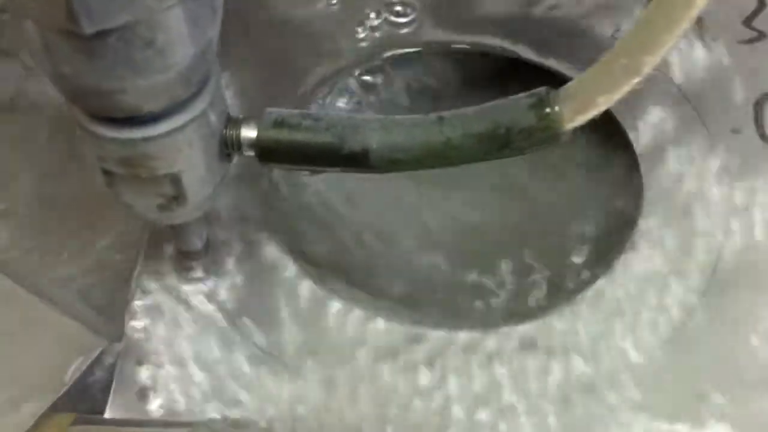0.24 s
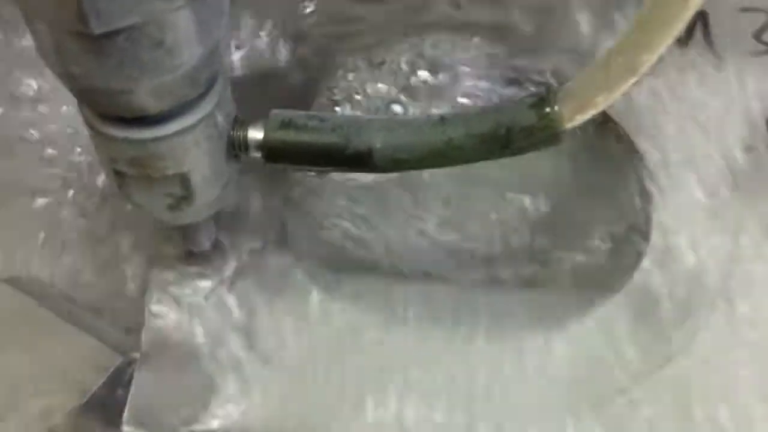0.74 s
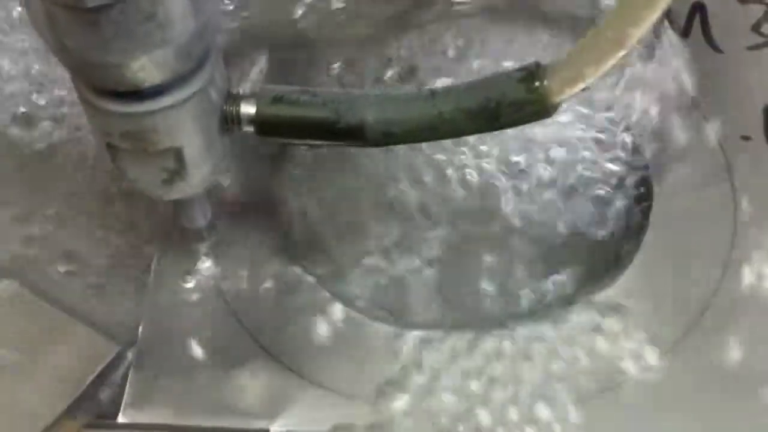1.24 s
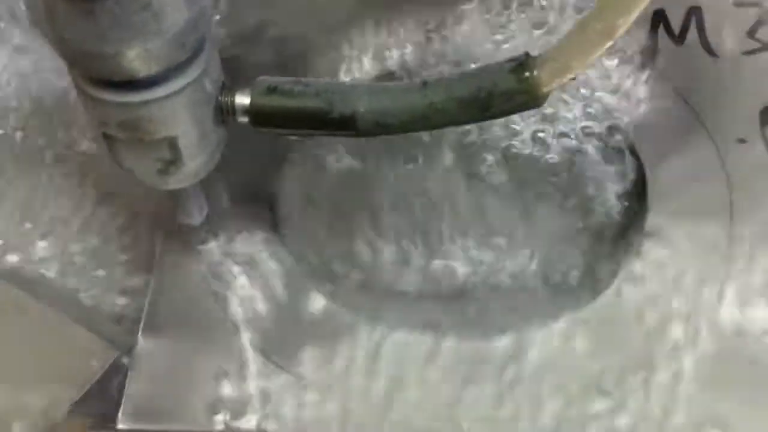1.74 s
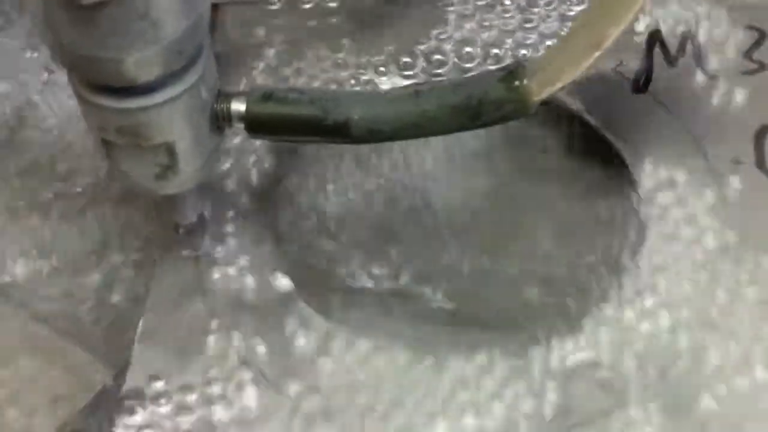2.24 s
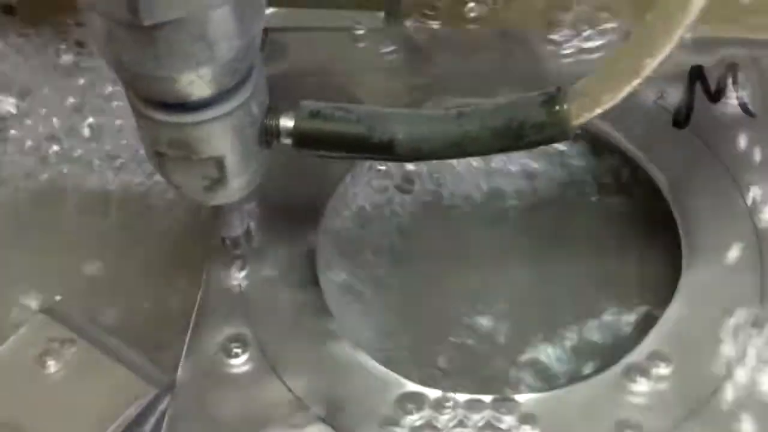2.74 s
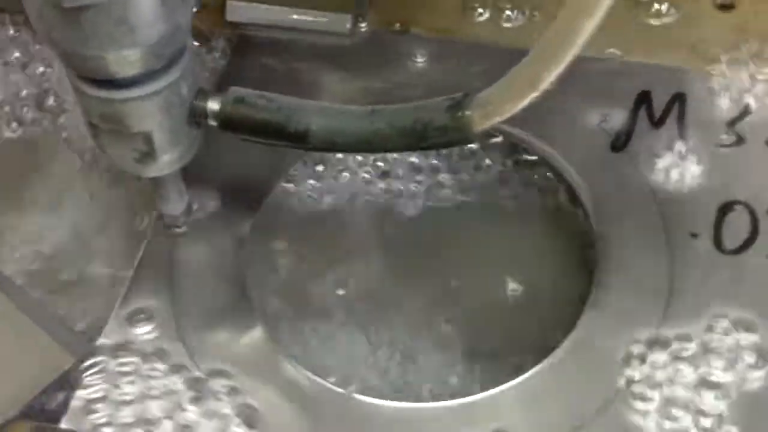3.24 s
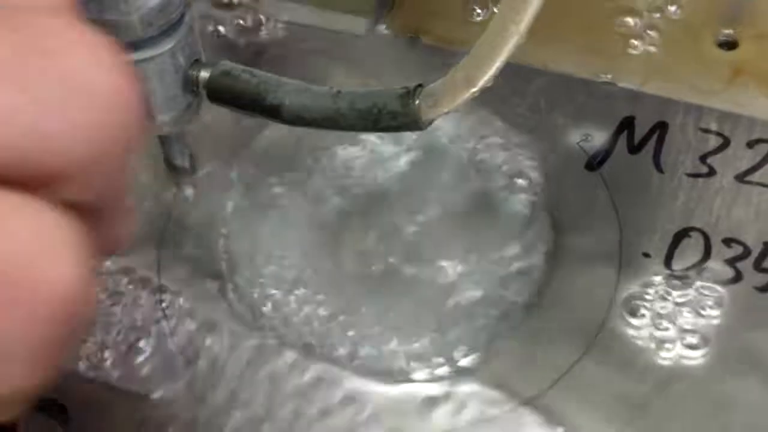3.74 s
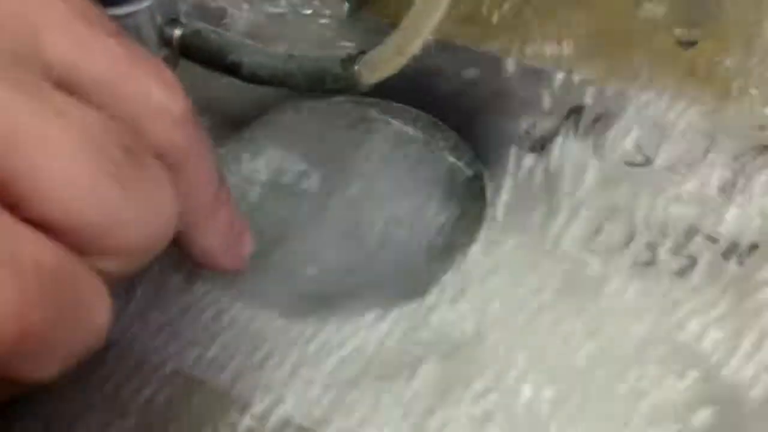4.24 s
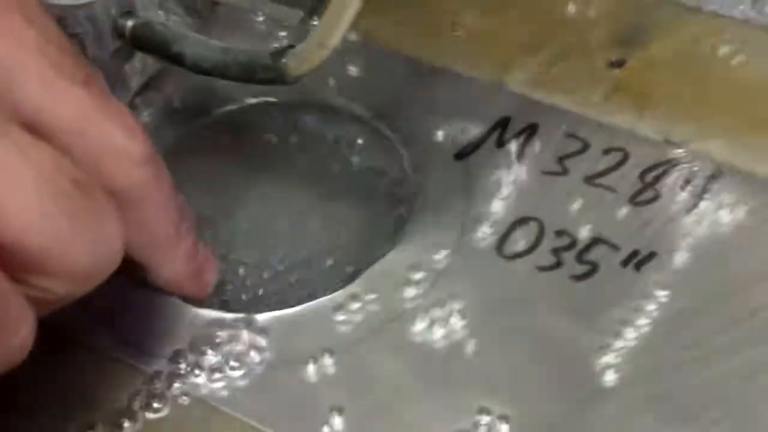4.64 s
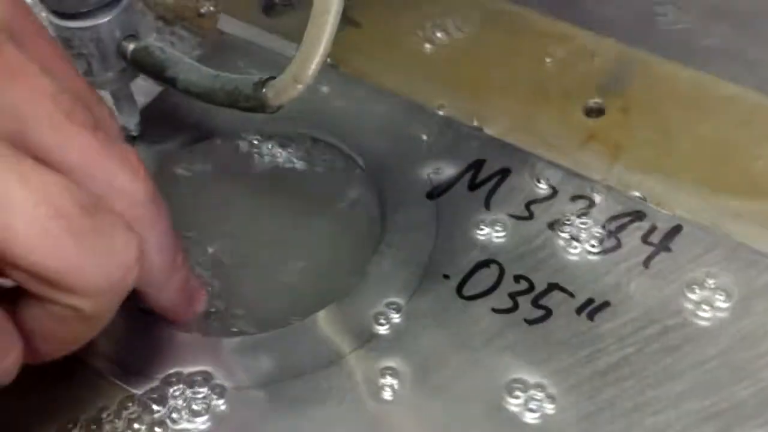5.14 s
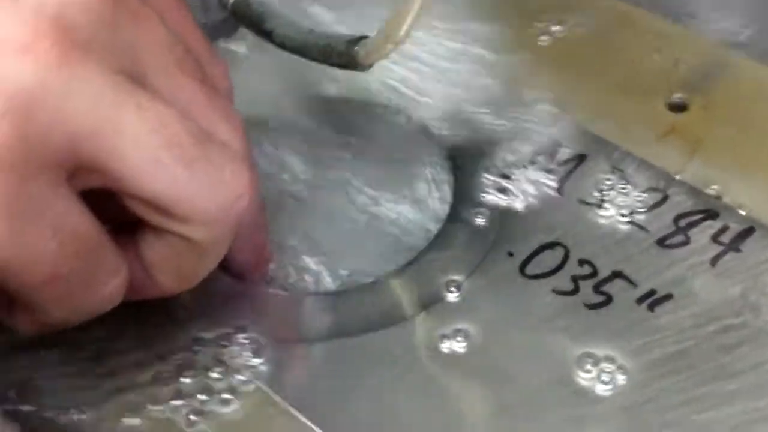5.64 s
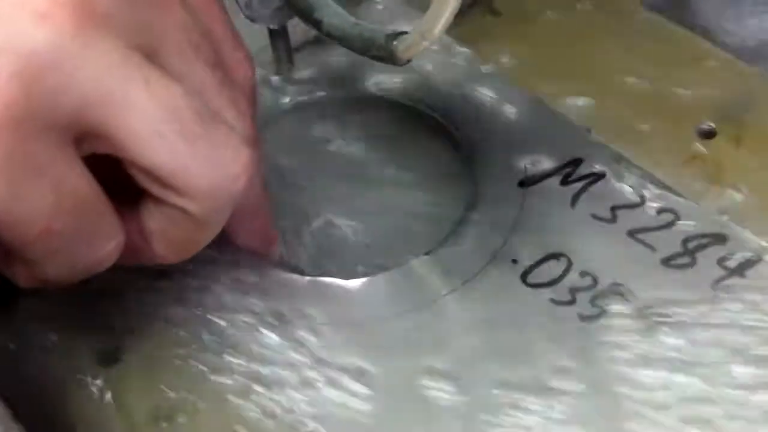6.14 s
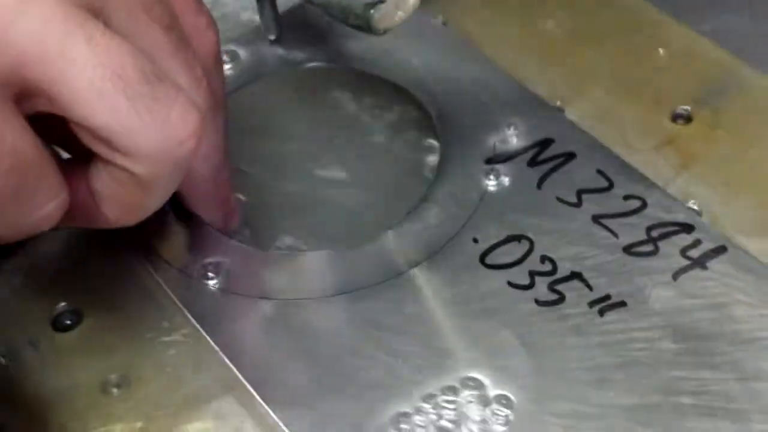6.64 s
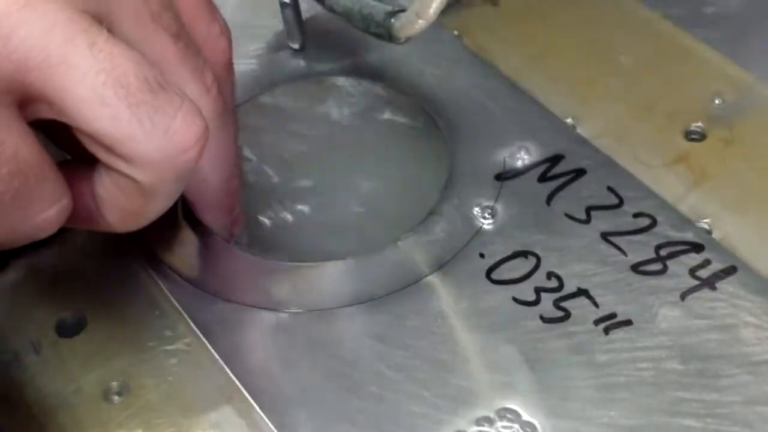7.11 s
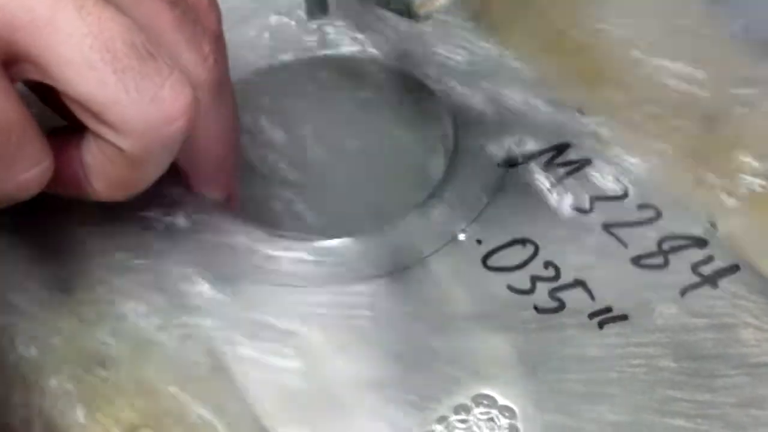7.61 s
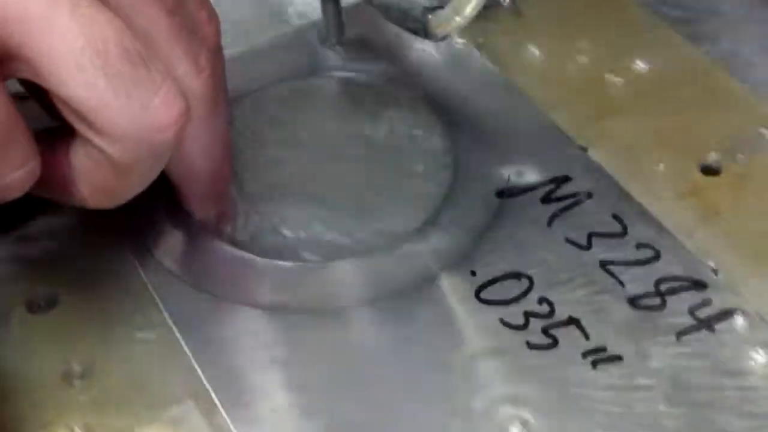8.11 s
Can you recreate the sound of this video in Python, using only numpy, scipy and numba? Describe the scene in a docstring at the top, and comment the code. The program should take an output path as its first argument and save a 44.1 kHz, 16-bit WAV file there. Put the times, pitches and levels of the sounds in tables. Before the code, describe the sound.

Very close and slightly overloaded, a cutting waterjet shrieks and hisses against thin steel over a churning tank. Airy squeals come and go, and drops and gusts give the microphone dull thumps. Three times, water washes over the nozzle, choking the jet to a softer, spitting hiss with bubbling and a low hum underneath. Each time the piercing hiss bursts back through.

```python
"""Waterjet cutting steel

An abrasive waterjet cuts a thin steel sheet awash in its tank, very close to the microphone. In open air
its turbulence excites the gap between nozzle and sheet, and the shriek overloads the microphone. When
water washes over the nozzle the jet sputters and drops to a muffled hiss, unmasking the churning tank
and its low, wavering boom. Spray and gusts buffet the diaphragm."""
import sys
import numpy as np
from scipy import signal
from scipy.fft import rfft, irfft, next_fast_len
from scipy.io import wavfile
from scipy.ndimage import uniform_filter1d
from numba import njit

SR = 44100
rng = np.random.default_rng(int(sys.argv[2]) if len(sys.argv) > 2 else 0)


def put_to_file(sound):
    """Save the sound as 16-bit audio at rate SR, in the file named by the first command-line argument."""
    columns = np.atleast_2d(sound).T  # one column per channel
    safe = np.clip(columns, -1, 1)
    whole_steps = np.round(safe * 32767)
    wavfile.write(sys.argv[1], SR, whole_steps.astype(np.int16))


N = 369116
TIME = np.arange(N) / SR


def undb(db):
    """Amplitude ratio of a level in decibels."""
    return 10 ** (np.asarray(db) / 20)


def unit(x):
    """Normalisation to an rms of one."""
    return x / np.sqrt(np.mean(x ** 2))


def contour(table):
    """Linear interpolation in time through rows of seconds and value."""
    return np.interp(TIME, *np.transpose(table))


def swell(middle, length):
    """Raised-cosine pulse of height one."""
    return np.cos(np.pi * np.clip((TIME - middle) / length, -.5, .5)) ** 2


def held(start, end, decay_s):
    """Unit gate with an exponential release."""
    return (TIME >= start) * np.exp(-np.clip((TIME - end) / decay_s, 0, 20))


def noise():
    """Gaussian white noise."""
    return rng.standard_normal(N)


def walk(cutoff_hz):
    """Slow random fluctuation: low-passed noise with a spread of one."""
    white = rng.standard_normal(4096)
    hz = np.fft.rfftfreq(len(white), TIME[-1] / len(white))
    smooth = unit(irfft(rfft(white) / (1 + (hz / cutoff_hz) ** 4)))
    return np.interp(TIME, np.linspace(0, TIME[-1], len(white)), smooth)


def colour(x, spectrum):
    """Minimum-phase filtering through rows of Hz and dB; the result has an rms of one."""
    hz, db = np.transpose(spectrum)
    size = next_fast_len(N) * 2
    log_hz = np.log(np.fft.rfftfreq(size, 1 / SR) + 1)
    log_gain = np.log(undb(np.interp(log_hz, np.log(hz), db)))
    cepstrum = irfft(log_gain)[:size // 2]
    cepstrum[1:] *= 2  # folding the cepstrum makes the filter causal
    response = np.exp(rfft(cepstrum, size))
    return unit(irfft(rfft(x, size) * response)[:N])


@njit
def band(x, hz, width_hz):
    """Second-order resonator: a state-variable band-pass whose centre may move."""
    y, band_state, low_state = np.empty(len(x)), 0., 0.
    for i in range(len(x)):
        omega = 2 * np.pi * min(hz[i], .45 * SR) / SR
        gain, damping = np.tan(omega / 2), 2 * np.pi * width_hz / SR / np.sin(omega)
        passed = (band_state + gain * (x[i] - low_state)) / (1 + gain * (gain + damping))
        band_state = 2 * passed - band_state
        low_state += 2 * gain * passed
        y[i] = damping * passed
    return y


def resonate(x, hz, width_hz):
    """Two resonators in cascade give a steep resonance; the result has an rms of one."""
    return unit(band(band(x, hz, float(width_hz)), hz, float(width_hz)))


def ring(hz, width_hz, wander):
    """Turbulence excites a resonance whose centre drifts by the fraction `wander`."""
    centre = hz * (1 + wander * walk(24))
    return resonate(noise(), centre, width_hz)


def drops(per_s, spread_db):
    """Shot noise: impacts of either sign at random moments, most small and a few large."""
    size = undb(spread_db * np.minimum(rng.exponential(size=N), 4))
    return (rng.random(N) < per_s / SR) * size * np.sign(noise())


def ripples(x, depth, rate_hz, longest_s, count=16):
    """Comb filtering: short reflections off rippling water come and go, so the colour swirls."""
    lags = (1 + rng.random(count) * longest_s * SR).astype(int)
    echoes = sum(walk(rate_hz) * np.roll(x, lag) for lag in lags)
    return (x + depth * echoes / np.sqrt(count)) / np.sqrt(1 + depth ** 2)


# How hard the jet boils the tank. Each row: time in seconds, relative level in dB.
BOIL = [(0, -3), (3.65, 2.5), (3.85, -8), (4.02, 3), (4.12, -2), (5.3, -1.5), (5.6, -5.5), (5.84, 5.5),
        (6.2, 7), (6.33, 0), (7.24, -3), (7.33, -3.5), (7.54, -4), (7.61, 4.5), (7.7, 0.5), (8.3, 3)]
# Spectrum of the bubbles. Each row: frequency in Hz, relative density in dB.
BUBBLE_SPECTRUM = [(30, 3), (130, 2), (230, -2), (500, -3.5), (780, -0.5), (1030, 6.5), (1150, 3),
                   (1300, 6.5), (1750, 4), (2050, 0), (2450, 3), (3000, -5.5), (4400, -15), (9000, -25)]


def tank_churn():
    """Bubble noise: the spent jet churns the water, and a crowd of bubbles merges into a gurgle."""
    bubbles = colour(noise() + unit(drops(per_s=900, spread_db=1)), BUBBLE_SPECTRUM)
    gurgle = ripples(bubbles, depth=0.53, rate_hz=10, longest_s=.012)
    return gurgle * undb(-29.5 + contour(BOIL) + 2.46 * walk(17))


# Partials of the tank's boom. Each row: frequency in Hz, relative level in dB.
BOOM_PARTIALS = [(80.7, -33.5), (107.7, -39), (166.9, -43.5), (349.9, -46), (409.1, -56)]
# Swells of the boom. Each row: middle and length in seconds, change of the lowest partial in dB,
# change of the upper partials in dB.
BOOM_SWELLS = [(3.85, .8, 3, 8), (5.776, 0.42, 12.5, 9), (6.08, 0.67, -12, 12.5)]


def tank_boom(lowest_db=-8, upper_db=-12):
    """Resonance: the water tank booms in low, wavering partials that swell as it boils."""
    for middle, length, lowest_change, upper_change in BOOM_SWELLS:
        shape = swell(middle, length)
        lowest_db = lowest_db + lowest_change * shape
        upper_db = upper_db + upper_change * shape
    tones = []
    for hz, db in BOOM_PARTIALS:
        amplitude = np.sqrt(2) * undb(db + 2 * walk(2.7))
        wavering_hz = hz * (1 + 0.0138 * walk(8.9))
        tones.append(amplitude * np.sin(2 * np.pi * np.cumsum(wavering_hz) / SR))
    return (tones[0] * undb(lowest_db) + sum(tones[1:]) * undb(upper_db)) * undb(0.82 * contour(BOIL))


# Spectrum of a jolt to the microphone. Each row: frequency in Hz, relative density in dB.
JOLT_SPECTRUM = [(5, 4.5), (25, 1), (60, -1.5), (130, -4.5), (300, -10), (700, -12.5), (1500, -16),
                 (4000, -16.5), (12000, -59.5)]
# Gusts that strike the microphone. Each row: start and length in seconds, relative buffeting in dB,
# relative shove on the diaphragm in dB.
GUSTS = [(0.128, 0.094, -20, -25), (0.348, 0.08, -23.5, -27), (0.556, 0.029, -31, -25),
         (0.729, 0.018, -15.5, -25), (0.825, .04, -24, -21), (1.11, 0.042, -16.5, -20),
         (2.169, 0.081, -18.5, -22), (2.497, 0.077, -20, -20), (2.607, 0.017, -17, -19),
         (3.003, 0.065, -28, -10), (3.691, 0.013, -27, 0), (4.195, 0.022, -16, -1), (4.427, 0.013, -26, -3),
         (5.258, 0.017, -19.5, -25), (6.306, 0.032, -23.5, -25), (6.37, 0.058, -18, -19),
         (7.117, .02, -16, -20), (7.417, .02, -49, -8), (7.473, 0.016, -36, 6.5), (7.794, 0.048, -21.5, -9),
         (7.981, 0.024, -22, -22)]


def gusts(rise_s=0.0052, fall_s=0.023):
    """Damped transient: a gust shoves the diaphragm aside with a short rumble, and it swings back."""
    rumble, out = undb(-16) * colour(noise(), JOLT_SPECTRUM), 0
    for start, _, _, shove_db in GUSTS:
        age = np.clip(TIME - start, 0, 1)
        rise, fall = 1 - np.exp(-age / rise_s), np.exp(-age / fall_s)
        swing = age / (2 * fall_s) - 1
        out = out + undb(shove_db) * rise * fall * (swing + rumble * fall)
    return out


# Blast of spray towards the microphone. Each row: time in seconds, relative level in dB.
BLAST = [(0, -35), (1.05, -28.5), (1.25, -22), (1.95, -23.5), (2.05, -31.5), (2.5, -26), (3.1, -29),
         (3.4, -19), (3.6, -33), (4.15, -45), (4.62, -37.5), (4.85, -19.5), (5.15, -23), (5.38, -49),
         (6.3, -38), (6.52, -30.5), (6.73, -16), (6.82, -27.5), (7.16, -22.5), (7.26, -40.5), (7.7, -38.5),
         (8.12, -30.5), (8.22, -13.5), (8.37, -18.5)]


def spray(clear, puff_rise_s=0.0035, puff_fall_s=0.0049):
    """Wind noise: drops and eddies from the open jet and the gusts jolt the microphone; the air heaves."""
    impacts = unit(drops(per_s=260, spread_db=5.5))
    jolts = colour(impacts + 0.65 * noise(), JOLT_SPECTRUM)
    thrown = np.minimum(uniform_filter1d(clear, SR // 50), 1)
    steady = thrown * undb(contour(BLAST) + 1.3 * walk(18.7))
    puffs = 0
    for start, length, buffet_db, _ in GUSTS:
        rise = np.clip((TIME - start) / puff_rise_s, 0, 1)
        puffs = puffs + undb(buffet_db) * rise * held(start, start + length, puff_fall_s)
    heave = np.maximum(thrown, 0.18) * undb(-21) * walk(23.4)  # some remains while the jet is covered
    return jolts * np.hypot(undb(9) * steady, undb(6.5) * puffs) + heave


# The biggest drops to hit the microphone. Each row: time in seconds, relative peak in dB.
BIG_DROPS = [(0.134, -8), (0.64, -13), (0.734, -15), (1.017, 3), (1.119, -6), (1.576, -14), (1.696, -11),
             (2.177, -11), (2.304, -14), (2.499, -10), (2.61, -13), (3.224, 6), (3.688, -26), (4.191, -22),
             (4.427, -17), (5.064, -23), (6.303, -21), (6.382, -5), (6.617, -14), (7.04, -4), (7.126, -6),
             (7.467, -12)]


def drop_knocks(gain_db=3):
    """Impulse response: each big drop gives the diaphragm one hard, dull knock."""
    knock = colour(signal.unit_impulse(N), JOLT_SPECTRUM)[:SR // 10]
    hits = np.zeros(N)
    for start, db in BIG_DROPS:
        hits[int(start * SR)] = undb(db + gain_db)
    return -signal.fftconvolve(hits, knock / np.abs(knock).max())[:N]


# The nozzle stands clear of the water. Each row: start, end, draining time and flooding time in seconds.
OPEN_SPANS = [(0, 3.647, .01, .09), (4.116, 5.524, .15, .13), (6.27, 7.26, .008, .07),
              (7.696, 8.4, .03, .01)]
# The covered jet spurts through. Each row: start and length in seconds, gain in dB.
SPURTS = [(3.691, 0.0046, -2.5), (3.744, 0.0068, -10.5), (3.79, .003, -23), (3.799, 0.0028, 2.5),
          (3.922, .004, -15.5), (3.942, .004, -25), (3.978, .006, -20), (4.049, .005, -14),
          (4.057, .014, -8), (5.472, 0.013, -10), (5.512, 0.016, -6), (5.625, .002, -17), (7.371, 0.05, 2),
          (7.445, 0.0053, 2), (7.464, .037, 2), (7.507, 0.021, -8), (7.561, 0.013, -10),
          (7.629, 0.0059, -1), (7.642, 0.0054, -3)]
# A wave chokes the open nozzle. Each row: start and length in seconds, nominal gain in dB.
CHOKES = [(0.685, 0.0255, -16.5), (.767, 0.017, -9), (0.994, .016, -13), (2.336, 0.016, -9),
          (2.371, 0.016, -8), (3.592, 0.017, -8), (4.247, 0.0205, -12), (4.301, .011, -15),
          (7.849, 0.0086, -14)]


def clearance(edge_s=0.0014, close_s=0.003, lapping_db=-5.5):
    """Transmission gain of the jet: it breaks through the water at once and is swallowed more slowly."""
    gate = np.zeros(N)
    for start, end, drain_s, flood_s in OPEN_SPANS:
        wet = np.clip(np.maximum(1 - (TIME - start) / drain_s, 1 - (end - TIME) / flood_s), 0, 1)
        gate = np.maximum(gate, undb(lapping_db * wet) * held(start, end, close_s))
    for start, length, db in SPURTS:
        gate = np.maximum(gate, undb(db) * held(start, start + length, close_s))
    for start, length, db in CHOKES:
        choked = (TIME >= start) & (TIME < start + length)
        deepening = 1.5 - np.exp((start - TIME[choked]) / close_s)
        gate[choked] *= undb(db * deepening)
    return uniform_filter1d(gate, int(edge_s * SR))


# Spectrum of the submerged jet. Each row: frequency in Hz, relative density in dB.
MUFFLED_SPECTRUM = [(2000, -11.5), (4400, -8.5), (5500, -5), (5900, 1), (6400, -4), (7400, 1), (8400, -2.5),
                    (9250, -5.5), (10400, 3), (11500, 0), (12600, -3), (13300, -3.5), (15500, -12)]


def covered_jet(clear, sink_s=0.083):
    """Transmission loss: water leaves a muffled hiss and a thin nozzle resonance that grows with depth."""
    hiss = ripples(colour(noise(), MUFFLED_SPECTRUM), depth=0.35, rate_hz=10, longest_s=.004)
    last_clear_s = np.maximum.accumulate(TIME * (clear > .05))
    sunk = np.minimum((TIME - last_clear_s) / sink_s, 1)
    nozzle = undb(-13.5 + 8.5 * sunk) * ring(hz=8680, width_hz=200, wander=0.0026)
    return (hiss + nozzle) * undb(-25.5 + 0.55 * contour(BOIL) + 1.3 * walk(70))


# The loudest squeals. Each row: middle and half-length in seconds, frequency and bandwidth in Hz,
# relative level in dB.
SQUEALS = [(.06, 0.16, 3600, 800, -22), (.07, 0.13, 4470, 1200, -14.5), (0.51, 0.25, 4520, 900, -22),
           (.83, 0.15, 3500, 1500, -20), (.98, .1, 5700, 1800, -17), (1.21, 0.2, 5900, 1700, -13.5),
           (2.075, 0.023, 7270, 700, -15), (2.225, 0.074, 6400, 1600, -14), (2.563, .1, 7180, 1500, -13),
           (2.735, 0.091, 12520, 500, -9), (2.8, 0.072, 10170, 500, -11), (3.24, 0.08, 7140, 900, -11),
           (4.136, 0.03, 4170, 2400, -19.5), (4.42, 0.1, 10560, 450, -8), (5.133, 0.16, 6900, 1500, -11),
           (5.28, 0.23, 7520, 900, -13), (6.92, 0.35, 11670, 700, -29), (7.056, 0.28, 7080, 1200, -11),
           (7.415, 0.053, 10800, 500, -22), (7.565, 0.0082, 8200, 1510, -7),
           (7.633, 0.0085, 11500, 1200, -2), (7.897, 0.061, 7250, 1540, -15),
           (8.05, 0.28, 11060, 500, -13.5)]


def squeals(wander=0.0096):
    """Edge tones: now and then the jet locks onto one airy tone at the edge of the cut."""
    out, drift, turbulence = np.zeros(N), 1 + wander * walk(10.4), noise()
    for middle, half_length, hz, width_hz, db in SQUEALS:
        near = np.abs(TIME - middle) < half_length
        tone = resonate(turbulence[near], hz * drift[near], width_hz)
        out[near] += np.sqrt(2) * undb(db) * np.hanning(len(tone)) * tone
    return out


def stutter(per_s, depth_db, length_s):
    """Amplitude modulation: drops cross the jet at random and choke it for a few milliseconds."""
    hits = (rng.random(N) < per_s / SR) * rng.exponential(size=N)
    dips = signal.fftconvolve(hits, np.hanning(int(length_s * SR)), "same")
    return undb(-depth_db * dips)


# Modes of the gap between nozzle and sheet. Each row: frequency and bandwidth in Hz, relative level in dB.
GAP_MODES = [(8520, 700, -1), (10250, 550, -3), (11250, 700, -1), (12700, 480, -4), (14000, 450, -11)]
# Strength of those modes as the gap fills and drains. Each row: time in seconds, relative level in dB.
GAP_STRENGTH = [(0, -10.5), (1.1, -1.5), (2.3, -0.5), (2.8, -9), (3.5, -1.5), (4.4, -9), (6.4, -7),
                (7, -13), (8.3, -6.5)]
# Broad rush of the open jet. Each row: frequency in Hz, relative density in dB.
RUSH_SPECTRUM = [(300, -29), (2000, -19), (3500, -13), (5000, -7), (7000, -5.5), (8600, -4), (9200, -3.5),
                 (9900, 1), (11500, -2.5), (13000, -0.5), (15500, -8.5)]


def open_jet(clear, gain_db=-1.65, usual_blast_db=-24.5, calm_blast_db=-35):
    """Forced resonance: the rushing jet rings the gap; sloshing water retunes a shriek and a whistle."""
    gap_db, blast_db, slosh = contour(GAP_STRENGTH), contour(BLAST), walk(3.25)
    excess_db = blast_db - usual_blast_db
    fade_db = 0.41 * np.minimum(blast_db - calm_blast_db, 0)  # rush and whistle fade in a weak blast
    gap = unit(sum(undb(db + 2.06 * walk(20.4)) * ring(hz, width_hz, wander=0.0076)
                   for hz, width_hz, db in GAP_MODES))
    shriek_db = -8 + 0.004 * excess_db + 2 * walk(16)
    shriek = undb(shriek_db) * ring(hz=10870 * (1 + 0.018 * slosh), width_hz=1260, wander=0.031)
    whistle_db = -13.5 + fade_db + 3.54 * walk(24)
    whistle = undb(whistle_db) * ring(hz=7080 * (1 + 0.029 * slosh), width_hz=2100, wander=0.046)
    sizzle_db = -15 + 1.09 * TIME + 0.43 * excess_db + 1.6 * walk(3.4)  # grows as the cut goes on
    sizzle = undb(sizzle_db) * ring(hz=14220, width_hz=3840, wander=0.021)
    rush = undb(-4 + fade_db) * colour(noise(), RUSH_SPECTRUM)
    jet = undb(gap_db) * gap + shriek + whistle + sizzle + rush
    # the less the gap rings, the more the loose water colours the jet
    jet = ripples(jet, depth=0.41 * undb(-.6 * gap_db), rate_hz=9.2, longest_s=.0028)
    # the abrasive feeds unevenly, so the whole jet flutters; half covered, it sputters hard
    flutter_db = (1.7 + 3 * np.clip(1 - clear, 0, 1)) * walk(77) + 1.6 * walk(2.1)
    return jet * clear * stutter(per_s=5.3, depth_db=8.5, length_s=0.0061) * undb(gain_db + flutter_db)


def scene():
    """Superposition: all sources add at one microphone, the same in both channels."""
    clear = clearance()
    jet = open_jet(clear) + squeals() + covered_jet(clear)
    sound = jet + tank_churn() + tank_boom() + spray(clear) + drop_knocks() + gusts()
    return np.array([sound, sound])


def record(dry, ceiling=0.73, knee=2.06, cutoff_hz=15750):
    """Intermodulation: the overloaded microphone spreads the shriek into a rasp; a low-pass follows."""
    saturated = dry / (1 + np.abs(dry / ceiling) ** knee) ** (1 / knee)
    low_pass = signal.ellip(14, .1, 50, cutoff_hz, fs=SR, output="sos")
    return np.clip(signal.sosfiltfilt(low_pass, saturated), -1, 1)


dry = scene()
out = record(dry)
put_to_file(out)
```